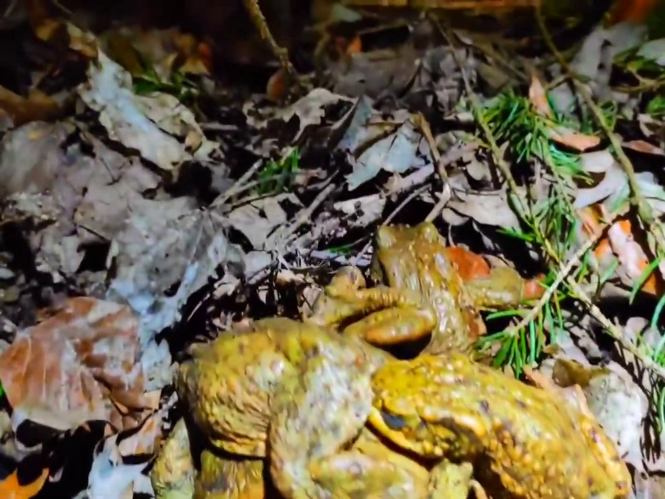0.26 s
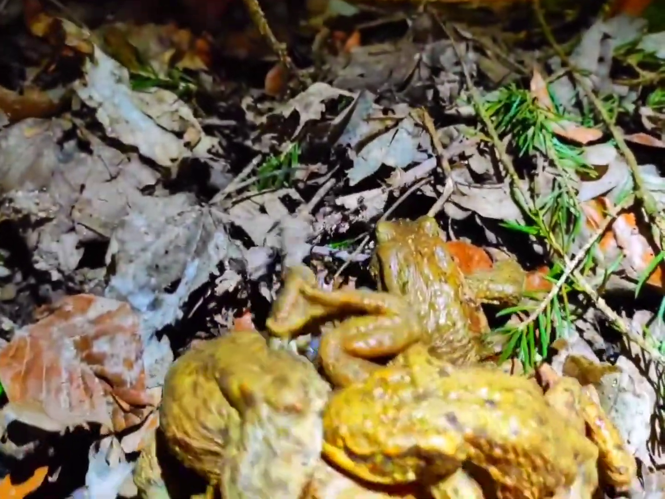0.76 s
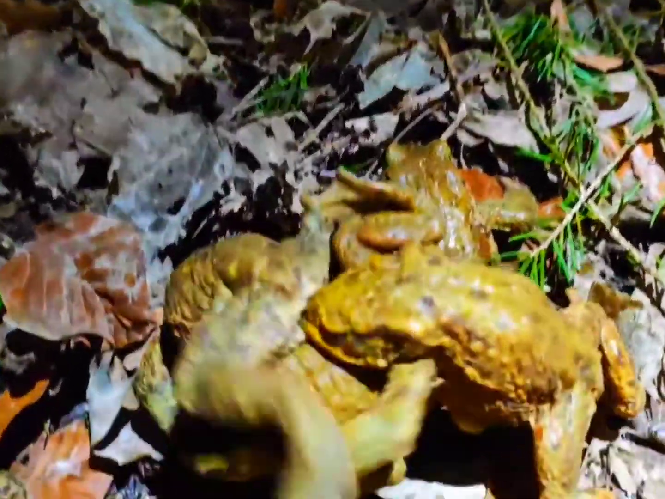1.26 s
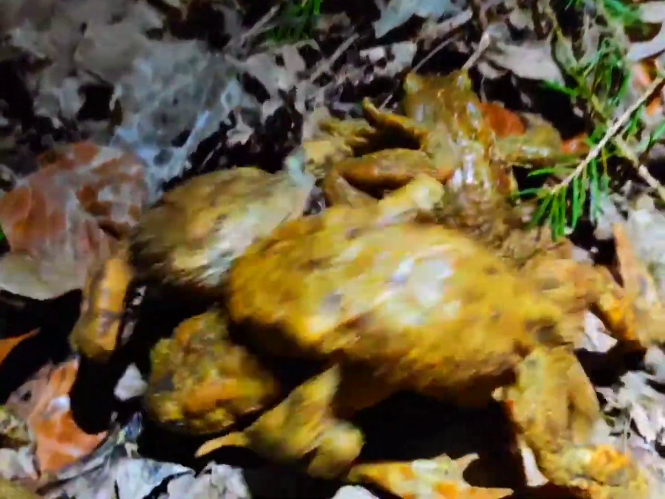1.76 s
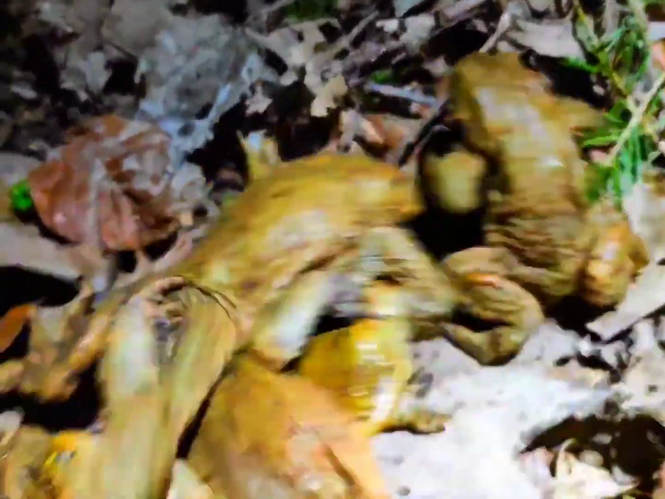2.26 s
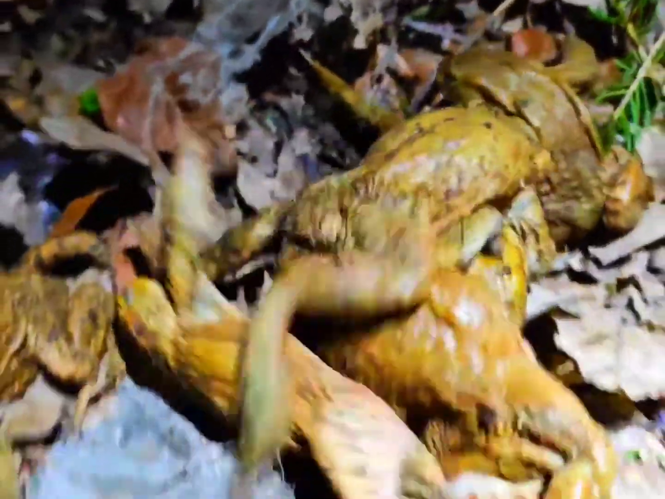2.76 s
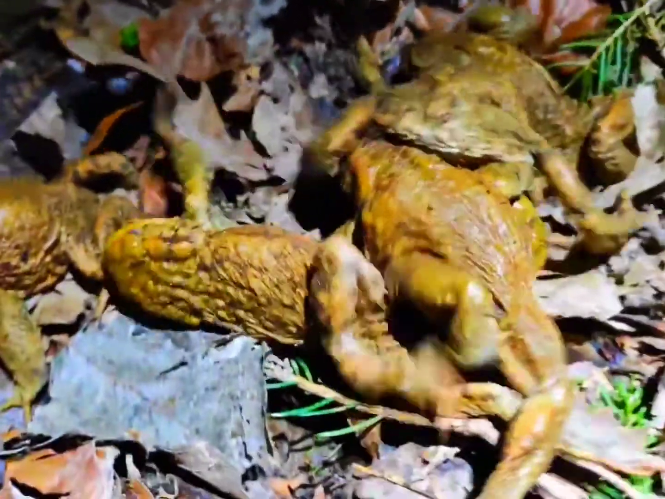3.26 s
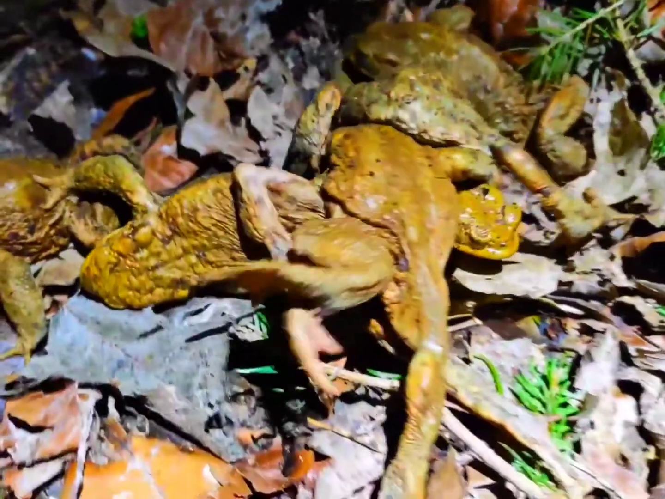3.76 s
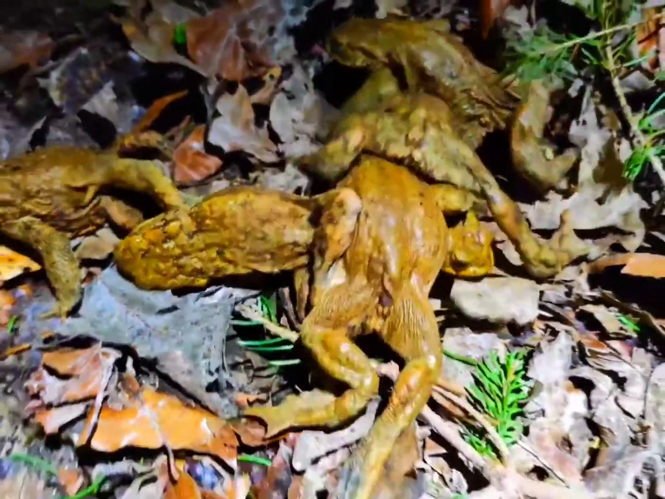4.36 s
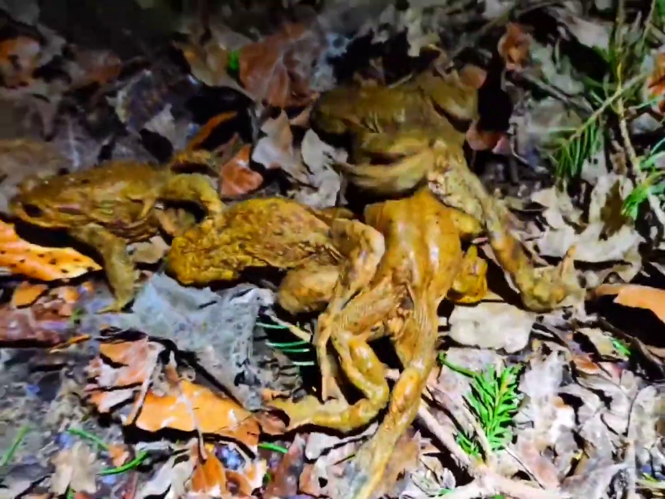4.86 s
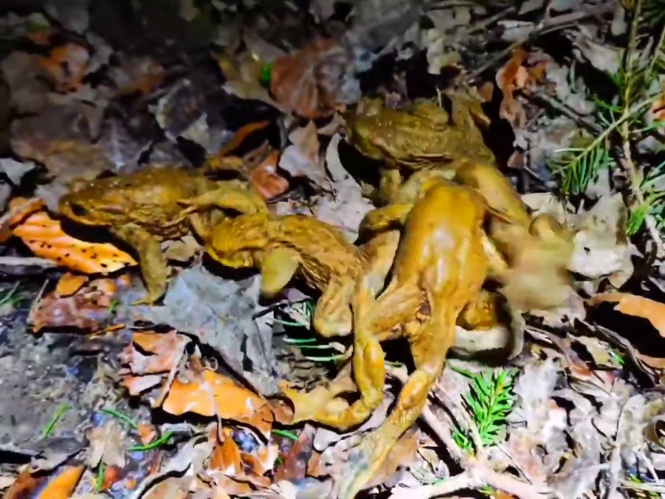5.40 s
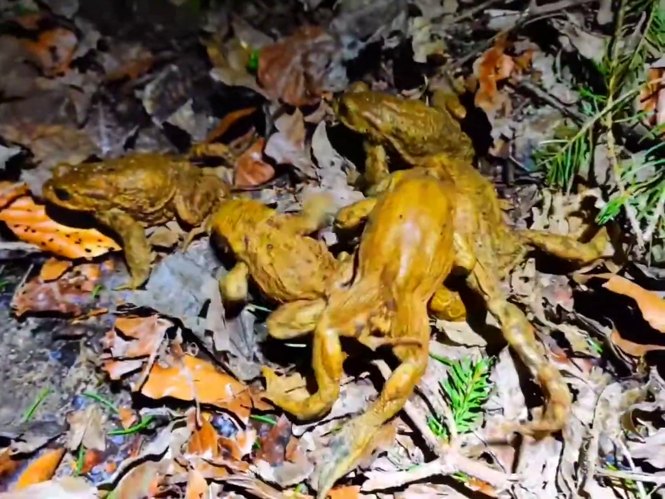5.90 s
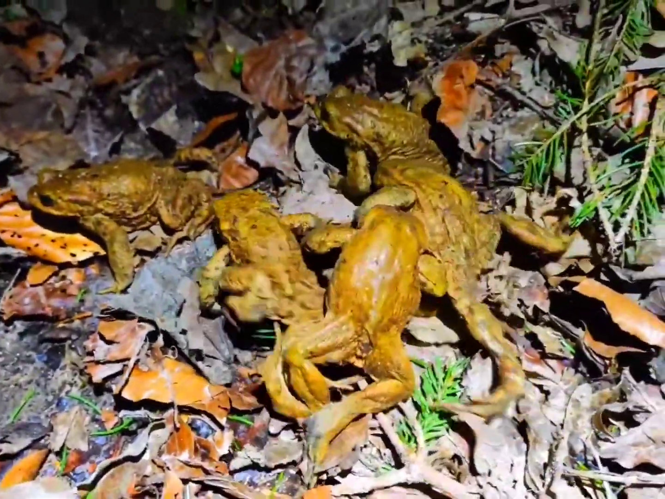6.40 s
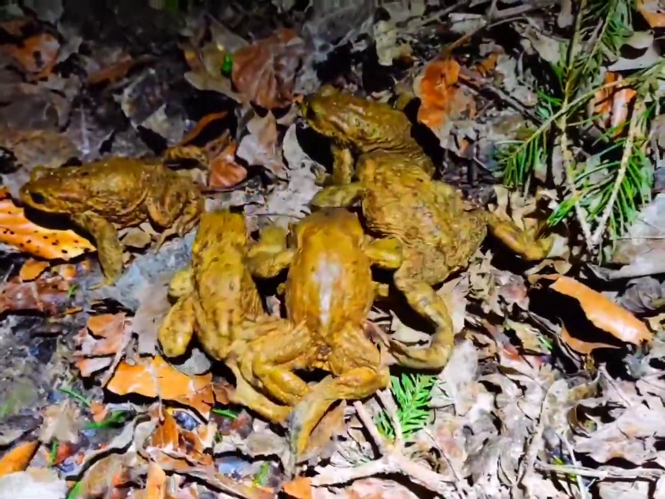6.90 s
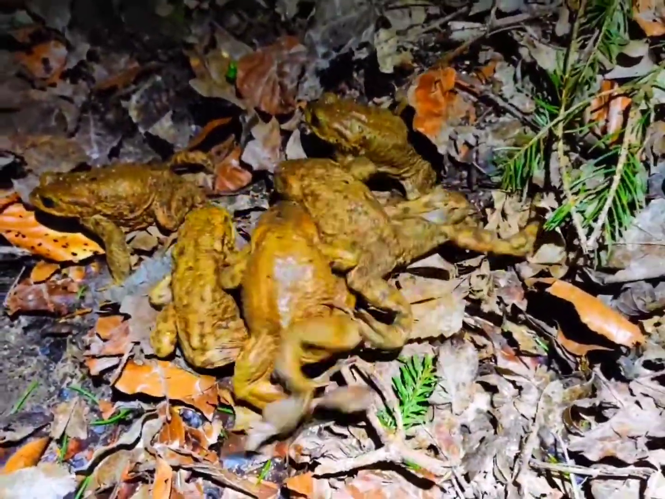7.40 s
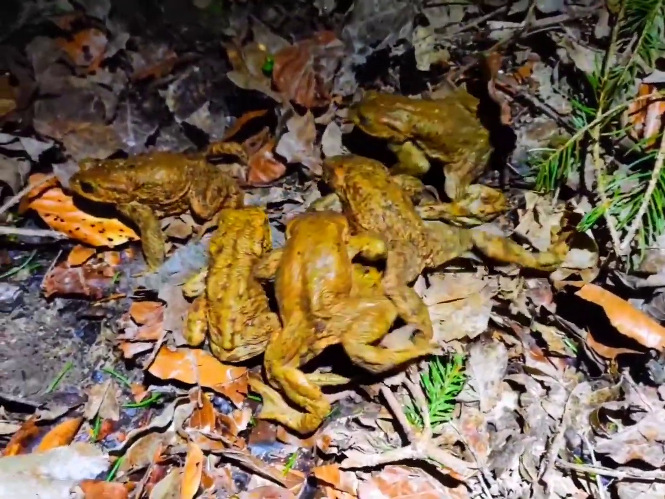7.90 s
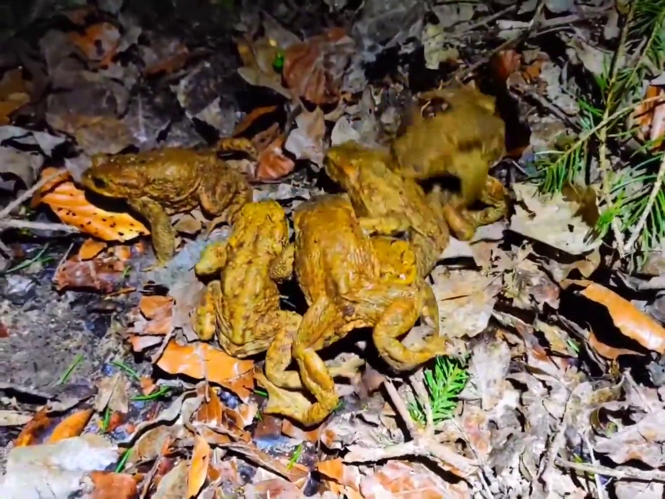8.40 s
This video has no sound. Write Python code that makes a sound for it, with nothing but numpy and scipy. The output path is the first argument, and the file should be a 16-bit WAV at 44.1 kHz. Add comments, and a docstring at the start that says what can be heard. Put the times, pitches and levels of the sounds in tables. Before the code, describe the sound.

A brief microphone rub and sharp pop, then close rustling and snapping of dry leaves as toads wrestle and occasionally chirp.

```python
"""Toads wrestle on dry leaves at night, close to a hand-held phone, and give short piping chirps.
Their vocal cords vibrate periodically: a nearly pure tone near 1 kHz with weak overtones.
The leaves hiss and scrape by friction, crackle, and ring briefly as they snap.
At first a finger covers the right microphone port, dulls it, rubs it and pops off as suction is released.
A far rumble and a faint hiss lie under all."""
import sys
import numpy as np
from scipy import signal
from scipy.fft import rfft, irfft, next_fast_len
from scipy.io import wavfile
from scipy.ndimage import uniform_filter1d, map_coordinates

SR = 44100
rng = np.random.default_rng(int(sys.argv[2]) if len(sys.argv) > 2 else 0)


def store_pcm(level_fs):
    """Save levels as 16-bit WAV."""
    pcm = np.round(np.clip(level_fs, -1, 1) * 32767).astype(np.int16)
    wavfile.write(sys.argv[1], SR, np.atleast_2d(pcm).T)


N = 381465

# Pan is the left level minus the right. Spectra give relative level per unit bandwidth.
# Contours of the three near chirps, one list each: t/s, f/Hz, level/dB, pan/dB
NEAR_CHIRPS = [
    [(1.852, 1125, -58, 0.5), (1.86, 1110, -33.5, 0.5), (1.876, 1028, -31, 0.5), (1.904, 1008, -29, 0.0),
     (1.958, 998, -30.5, -1), (1.998, 1034, -36, 3), (2.02, 1057, -42, 4.0), (2.032, 1040, -59, 4.0)],
    [(3.572, 1120, -32, -2), (3.582, 1065, -30, 3), (3.612, 1039, -38, 7), (3.626, 1026, -58, 2.5),
     (3.648, 1010, -44, -9.5), (3.672, 980, -42, -4), (3.68, 1002, -63, -5)],
    [(8.188, 985, -59, 0), (8.196, 989, -34, 2.5), (8.23, 997.4, -36, 3), (8.264, 1073, -44, 2.0),
     (8.28, 1050, -60, 2.5)],
]
# Partials of the three near callers: harmonic number, level/dB
LONG_VOICE = [(1, 1), (2, -25), (3, -30.5), (4, -24.5), (5, -46), (6, -28), (7, -38), (8, -31)]
STUTTER_VOICE = [(1, 0.5), (2, -34), (3, -20), (4, -35), (5, -26.5), (6, -40), (7, -24), (8, -34)]
LAST_VOICE = [(1, 1), (2, -19.5), (3, -20.5), (4, -27), (5, -31), (6, -23), (7, -37), (8, -39)]
LEFT_LAGS = [1.17, 0.63, 0.53]  # lag at the left port, per caller: phase/rad
OVERTONE_SLOPES = [1.2, 0.75, 1.5]  # overtone change per dB of fundamental, per caller: dB/dB
FALSE_STARTS = [(3.548, 1120, -27.5), (3.561, 1107, -26)]  # pips before the second chirp: t/s, f/Hz, level/dB
FAR_CHIRPS = [(4.2, .055, 1060, -65, 4), (4.742, .055, 1000, -66, 4), (5.969, 0.057, 1070, -62, 12),
              (6.704, 0.082, 1095, -63, 8), (7.524, 0.1, 1120, -61, 6)]  # distant toads: t/s, duration/s, f/Hz, level/dB, pan/dB

SHIFTING = [(0, -84), (.77, -63), (.96, -76), (1.15, -67), (1.56, -78), (1.76, -73), (1.79, -51),
            (2.3, -48), (2.85, -55), (3.35, -49), (3.66, -60.5), (3.71, -62), (3.85, -58), (4.6, -61),
            (4.9, -63), (5.3, -58.5), (5.7, -58.5), (6, -62), (7, -60.5), (7.45, -58), (7.85, -73),
            (8.2, -63.5), (8.65, -60)]  # hiss of leaves shifting under the toads: t/s, level/dB
SCUFFS = [(1.011, -58, 0.034, 0.018, -4), (1.102, -57, 0.028, 0.046, -1.5),
          (1.262, -50.5, 0.082, 0.029, -8), (1.389, -51, 0.042, 0.036, -6.5),
          (1.698, -56.5, 0.026, 0.037, -5), (1.774, -43, 0.003, 0.071, -7), (1.836, -37, 0.028, 0.016, -15),
          (2.094, -41, 0.21, 0.029, -8.5), (2.232, -39, 0.086, 0.048, -7.5),
          (2.474, -42, 0.036, 0.043, -13), (2.525, -43, 0.023, 0.058, -8.5), (2.69, -41, 0.024, 0.045, -8),
          (2.896, -48, 0.038, 0.035, -9), (2.944, -45, 0.028, 0.019, -12.9),
          (3.092, -48, 0.003, 0.353, -11.5), (3.443, -43, 0.015, 0.048, -35),
          (3.647, -50, 0.158, 0.014, -8), (3.938, -52.0, 0.047, 0.018, -11), (4.17, -53.5, 0.18, 0.05, -9),
          (4.35, -49, 0.028, 0.028, -8), (4.389, -51.5, 0.024, 0.017, -13.8),
          (4.447, -52, 0.046, 0.059, -9), (4.508, -53.5, 0.033, 0.039, -10), (4.605, -50, 0.039, 0.084, -9),
          (5.031, -51, 0.0034, 0.035, -4), (5.204, -47, 0.032, 0.07, -8), (5.368, -54, 0.031, 0.066, -8.9),
          (5.57, -45, 0.074, 0.15, -10), (5.798, -41, 0.003, 0.044, -11),
          (5.919, -51.5, 0.038, 0.013, -1.5), (6.111, -51.5, 0.051, 0.013, -6),
          (6.186, -51.5, 0.02, 0.025, -2.5), (6.334, -52.5, 0.053, 0.071, -11.5),
          (6.552, -62, 0.083, 0.056, -13), (6.62, -44.5, 0.0034, 0.044, -7),
          (6.742, -56.7, 0.049, 0.12, -10), (6.87, -56, 0.003, 0.047, -9),
          (7.088, -53.5, 0.108, 0.016, -13), (7.184, -52.5, 0.059, 0.03, -11.8),
          (7.257, -44.5, 0.0034, 0.13, -9), (7.458, -51, 0.021, 0.39, -7), (7.638, -54, 0.025, 0.024, -20),
          (7.758, -54, 0.025, 0.018, -3.5), (8.14, -51.5, 0.14, 0.29, -7.5), (8.336, -59, 0.023, 0.022, -7),
          (8.511, -58, 0.018, 0.025, -19)]  # leg drags: t/s, hiss level/dB, rise/s, fall/s, scrape re hiss/dB
HISS_SPECTRUM = [(1760, -32), (3000, -13.5), (3280, -15), (5560, -7), (6700, -1.5), (8130, -0.5),
                 (8420, -3.5), (10000, -18), (12400, -16.5), (15100, -15.5), (15700, -16.5)]  # fine leaf friction: f/Hz, level/dB
SCRAPE_SPECTRUM = [(300, -28), (700, -1.5), (1500, -2), (2600, -4.5), (3300, 0.5), (4500, -4),
                   (7000, -14.5)]  # coarse leaf friction: f/Hz, level/dB
LEAF_COHERENCE = [(1400, 0.16), (3100, 0.032), (6800, 0.49), (15000, 0.56)]  # leaf noise at the two ports: f/Hz, correlation
NEARNESS = [(1, 0.47), (2.4, 1.2), (3.4, 0.18), (5, -0.029), (7, -0.3), (8.65, -1.15)]  # the phone draws back from the leaves: t/s, nearness (1 close, -1 far)
NEAR_COLOUR = [(3000, -0.5), (6000, -4), (8500, 3), (11000, 3), (15000, 0)]  # what closeness adds to the hiss: f/Hz, gain/dB
SNAPS = [(0.1027, -50, 8790, -20, 10), (0.1486, -60, 5300, -28, 5), (0.3242, -53, 8640, -17, 10),
         (0.4269, -45.5, 8950, -24, 19), (0.5631, -47, 9150, -21, 18), (0.6843, -47, 8100, -10.5, 12.5),
         (0.8895, -44, 5000, -26, 9), (1.0133, -35.5, 7300, -22, 2), (1.059, -41.5, 6410, -15, -11),
         (1.2398, -35.5, 7650, -16, -13), (1.342, -40, 7900, -10, -2.5), (1.3887, -40, 5720, -25.5, -14),
         (1.6945, -34.5, 8430, -17, -0.5), (1.7731, -29, 8440, -14, -11), (1.8314, -21.5, 7990, -30, -7),
         (1.912, -30, 8020, -13, -2.0), (1.9879, -27, 8440, -24, -5.5), (2.088, -22.5, 8520, -25, 1),
         (2.2384, -25, 7790, -24, 1.5), (2.4024, -37, 7410, -18, -2.0), (2.4199, -27.5, 7900, -26, -3.5),
         (2.4581, -27.5, 8700, -25, -1.0), (2.5237, -20.5, 8240, -34, 8), (2.6218, -30, 7400, -12.5, 1),
         (2.687, -22, 7840, -23, 4), (2.7746, -30.5, 8300, -25, -5), (2.8759, -37, 8170, -18, 6),
         (2.9307, -38, 7850, -20, -0.5), (2.9437, -28.5, 8400, -24, 0.0), (3.0924, -35, 6780, -19, 0.5),
         (3.1796, -33, 7800, -23, -1.5), (3.427, -34, 6200, -25, -1), (3.567, -30, 6930, -9, -10),
         (3.676, -31, 7660, -35, -5), (3.7319, -41, 7250, -19, 4), (3.762, -34, 7190, -13, 5),
         (3.8169, -33.5, 8440, -10.5, 7), (3.8851, -38, 7960, -25, 3), (4.0202, -37, 7360, -17, 8),
         (4.0714, -33, 7850, -19, 7), (4.3485, -35, 6860, -19, 0.5), (4.3912, -31, 7900, -33, -7),
         (4.4422, -35, 7550, -12, 0.0), (4.5012, -41, 8070, -20, -2.5), (4.6034, -35.5, 8040, -12, -1),
         (4.8818, -42, 7040, -25, 5), (4.94, -31.5, 6730, -24, 5), (5.031, -36.5, 7100, -19, 3),
         (5.4286, -41, 7820, -26, -3), (5.7972, -31, 8300, -15, -8), (5.9107, -37, 7500, -11, -2.0),
         (6.0476, -38, 6300, -11, 1.0), (6.11, -36, 6640, -22, -3.0), (6.273, -32, 6430, -16, 7),
         (6.3011, -40, 6850, -16, -4.5), (6.3342, -20, 7430, -38, -7.5), (6.351, -29, 7650, -32, -9),
         (6.6225, -35, 7950, -23, 1.5), (6.869, -37, 6110, -25, 10), (6.884, -33, 7800, -27, -8),
         (7.0028, -32.5, 6270, -27, 11), (7.0567, -26, 6000, -40, 4), (7.0912, -28, 6790, -27, 2),
         (7.258, -33, 7160, -19, 1.0), (7.317, -31, 6530, -22, 12), (7.408, -37, 7700, -27, -2.5),
         (7.4844, -34, 7060, -27, -1.0), (7.5244, -33, 8140, -23, -7), (7.5428, -33, 7380, -19, 0.5),
         (7.7568, -36, 7540, -17, -3.0), (8.3654, -40, 6490, -15, 1.0), (8.3754, -42, 6500, -21, 0.0),
         (8.5038, -32, 6750, -29, 5)]  # breaking leaves: t/s, level/dB, f/Hz, thud re level/dB, pan/dB

RUBBING = [(0, -41), (.06, -37.5), (.23, -39.5), (.27, -28.5), (.38, -35.5), (.42, -45), (.49, -35.5),
           (.7, -45.5), (.83, -31), (.93, -31.5), (1.01, -41), (1.1, -37)]  # finger friction on the right port: t/s, level/dB
SLIPS = [(.263, -26.5, 0.00062), (.286, -33.5, 0.00038), (.36, -29, .0008), (.81, -34, .0008),
         (.878, -38, .0006), (0.9351, -19, 0.00063), (0.948, -25, .00016), (.961, -24, 0.000078),
         (0.9647, -18, 0.000091)]  # pressure pulses of slipping skin: t/s, level/dB, width/s
TAPS = [(.725, -45, 1040, 8), (0.772, -49, 800, 8)]  # light taps on the case: t/s, level/dB, f/Hz, pan/dB
COVERED_PORT = [(2000, -1.5), (4400, -2), (8000, -9), (10500, -10), (15000, 1)]  # response of the right port under the finger: f/Hz, gain/dB
PORT_BALANCE = [(60, -0.5), (180, 3), (550, 3), (1650, -3), (4970, 2.5), (15000, -9)]  # difference in colour between the ports: f/Hz, pan/dB

RUMBLE_SPECTRUM = [(4.7, -42), (8.0, 1.5), (47, -2.5), (64, -9), (106, -8.5), (157, -14), (228, -13),
                   (272, -16.5), (653, -26), (1080, -28.5), (1500, -39.5), (1950, -42), (3300, -120)]  # far rumble: f/Hz, level/dB
RUMBLE_COHERENCE = [(40, 0.79), (130, 0.76), (290, 0.67), (640, 0.29), (1400, 0.073)]  # rumble at the two ports: f/Hz, correlation
DRONE_LEVEL = [(1.2, -51.5), (1.66, -52.5), (2.09, -52.5), (2.51, -50.5), (7.34, -65), (7.88, -57),
               (8.65, -60.5)]  # deepest bass: t/s, level/dB
AIR_SPECTRUM = [(290, -37), (500, 5.5), (903, -34), (1040, -4.5), (1350, -10.5), (4290, -11.5), (6060, -17),
                (9080, -38), (11400, -40), (15700, -12.5)]  # night air and microphone hiss: f/Hz, level/dB

POP_S = 0.939  # the finger uncovers the right port


def toads():
    """Voiced calls: three near chirps, one with false starts, and faint far ones of falling pitch."""
    out = np.zeros((2, N))
    voices = [LONG_VOICE, STUTTER_VOICE, LAST_VOICE]
    for contour, voice, lag, slope in zip(NEAR_CHIRPS, voices, LEFT_LAGS, OVERTONE_SLOPES):
        add(out, contour[0][0], chirp(contour, voice, lag, overtone_slope=slope))
    rise_s, fall_s = 0.0039, 0.0058
    for s, hz, db in FALSE_STARTS:
        contour = [(s, hz, db - 13.5, 0), (s + rise_s, hz, db, 0), (s + rise_s + fall_s, hz, db - 27, 0)]
        add(out, s, chirp(contour, STUTTER_VOICE, LEFT_LAGS[1]))
    sag_hz_per_s = 720
    for s, length, hz, db, pan_db in FAR_CHIRPS:
        contour = [(s, hz, db, pan_db), (s + length, hz - sag_hz_per_s * length, db, pan_db)]
        add(out, s, chirp(contour, LAST_VOICE[:2], lag_rad=1.74, edge_s=0.025))
    return out


def chirp(contour, voice, lag_rad, edge_s=0.0016, overtone_slope=1):
    """Periodic vibration of the vocal cords gives a harmonic series with weak, unsteady overtones."""
    t = np.arange(contour[0][0], contour[-1][0], 1 / SR)
    hz, db, pan_db = curves(contour, t)
    phase = 2 * np.pi * np.cumsum(hz) / SR
    port_lag = np.array([[lag_rad], [0]])
    drifts_db = 10 * uniform_filter1d(rng.standard_normal((len(voice), len(t))), size=400, axis=1)
    tilt_db = (1 - overtone_slope) * (db.max() - db)
    tone = 0
    for (k, partial_db), drift_db in zip(voice, drifts_db):
        gain = amp(partial_db + (drift_db + tilt_db) * (k > 1))
        tone += gain * np.sin(k * phase + k * k - port_lag)
    fade = np.clip(np.minimum(t - t[0], t[-1] - t) / edge_s, 0, 1)
    return np.sqrt(2) * amp(db) * fade * tone * sides(pan_db)


def leaves():
    """Friction makes a fine hiss and a coarse scrape; shifting and scuffs, being incoherent, add in power."""
    t = np.arange(N) / SR
    hiss_power = amp(curves(SHIFTING)[0]) ** 2
    scrape_power = hiss_power * amp(-8) ** 2
    for s, db, rise, fall, scrape_db in SCUFFS:
        scuff_power = (amp(db) * hump(t, s, rise, fall)) ** 2
        hiss_power += scuff_power
        scrape_power += scuff_power * amp(scrape_db) ** 2
    # Clumps of leaves give way at once and settle.
    collapses_per_s, collapse_share = 70, 0.26
    collapses = (rng.random(N) < collapses_per_s / SR) * np.minimum(rng.exponential(size=N), 2.5)
    surge = unit(1 - collapse_share + collapse_share * settle(collapses, fall_s=0.014))
    clump_gain = amp(1.9 * wobble(per_second=40))
    fine = patchy(crackle(per_second=250, spread_db=4.5, share=0.33), depth_db=2)
    hiss = draw_back(stereo_noise(fine, HISS_SPECTRUM, LEAF_COHERENCE) * clump_gain)
    coarse = patchy(crackle(per_second=120, spread_db=3, share=0.13), depth_db=2.5)
    scrape = stereo_noise(coarse, SCRAPE_SPECTRUM, LEAF_COHERENCE) * clump_gain
    return surge * (np.sqrt(hiss_power) * hiss + np.sqrt(scrape_power) * scrape)


def crackle(per_second, spread_db, share):
    """A Poisson process of tiny cracks modulates the amplitude of two independent noises."""
    onsets = rng.random(N) < per_second / SR
    strengths = amp(spread_db * np.minimum(rng.exponential(size=N), 3))
    cracks = settle(onsets * strengths, fall_s=0.00097)
    return rng.standard_normal((2, N)) * (np.sqrt(1 - share) + np.sqrt(share) * cracks)


def patchy(pair, depth_db):
    """Each clump of leaves has its own spectrum: gain varies at random over time and frequency."""
    spectra = signal.stft(pair, nperseg=256)[2]
    field = uniform_filter1d(rng.standard_normal(spectra.shape[1:]), size=8, axis=0)
    field = uniform_filter1d(field, size=6, axis=1)
    return signal.istft(spectra * amp(depth_db * unit(field)), nperseg=256)[1][:, :N]


def draw_back(hiss):
    """Timbre depends on distance: the hiss passes from a crisp spectrum to a duller one."""
    close = unit(coloured(hiss, NEAR_COLOUR))
    far = unit(filtered(hiss, lambda hz: amp(-along(NEAR_COLOUR, hz))))
    share = np.clip((1 + curves(NEARNESS)[0]) / 2, 0, 1)
    return share * close + (1 - share) * far


def snaps():
    """Fracture excites a leaf impulsively: one damped mode, a broadband crack and a duller thud."""
    out, t = np.zeros((2, N)), np.arange(600) / SR
    attack = 1 - np.exp(-t / 0.00014)
    for s, db, hz, thud_db, pan_db in SNAPS:
        noise = rng.standard_normal(len(t))
        ring = np.sin(2 * np.pi * hz * t) * decay(t, t60_s=0.0059)
        crack = 0.2 * noise * decay(t, t60_s=0.0051)
        thud_noise = unit(np.diff(uniform_filter1d(noise, size=6), prepend=0))
        thud = 2.5 * amp(thud_db) * thud_noise * decay(t, t60_s=0.0044)
        add(out, s, amp(db) * attack * (ring + crack + thud) * sides(pan_db)[:, None])
    return out


def finger_rub():
    """Stick-slip friction of skin on the port gives a low rumble, grit and brief pressure dips."""
    t = np.arange(N) / SR
    lift_s, fade_s = 1.07, 0.086
    contact = np.clip((lift_s - t) / fade_s, 0, 1)
    rub_db, = curves(RUBBING)
    grit_db = -59 + 1.74 * (rub_db - np.mean(RUBBING, axis=0)[1])  # the grit swings wider than the rub
    rub = unit(coloured(rng.standard_normal(N), [(8, -11), (25, 13.5), (70, 2.5), (150, -12), (300, -80)]))
    grains = crackle(per_second=60, spread_db=6.5, share=1)[0]
    grit = unit(coloured(grains, [(90, -40), (200, 14), (600, -14), (1500, -60)]))
    slips = sum(amp(db) * np.exp(-((t - s) / width) ** 2) for s, db, width in SLIPS)
    return contact * (amp(rub_db) * rub + amp(grit_db) * grit) - slips


def finger_pop():
    """Suction rarefies the trapped air; the seal breaks, the pressure rebounds and air hisses in."""
    t = np.arange(N) / SR
    suction = amp(-13.5) * hump(t, POP_S - 0.008, rise_s=0.0057, fall_s=0.0026)
    pop = amp(2) * hump(t, POP_S, rise_s=0.00019, fall_s=0.00019)
    rebound = amp(-11) * hump(t, POP_S + 0.0014, rise_s=0.001, fall_s=0.008)
    air = unit(coloured(rng.standard_normal(N), [(300, -20), (1500, 0), (6500, -7), (9000, -40)]))
    inrush = amp(-44) * hump(t, POP_S, rise_s=0.0037, fall_s=0.022) * air
    return rebound + inrush - suction - pop


def case_taps():
    """Each light impact excites one heavily damped mode of the case."""
    out, t = np.zeros((2, N)), np.arange(600) / SR
    for s, db, hz, pan_db in TAPS:
        ring = np.sin(2 * np.pi * hz * t) * decay(t, t60_s=0.012)
        add(out, s, amp(db) * ring * sides(pan_db)[:, None])
    return out


def night():
    """Ambient noise: a far rumble, most coherent at long wavelengths, a deep drone and a faint hiss."""
    rumble = stereo_noise(rng.standard_normal((2, N)), RUMBLE_SPECTRUM, RUMBLE_COHERENCE)
    rumble *= amp(-52.5 + 1.06 * wobble(per_second=5))
    drone_spectrum = [(22, -19), (38, 7), (46, 2.5), (70, -43.5)]
    drone = stereo_noise(rng.standard_normal((2, N)), drone_spectrum, coherence=[(40, 0.39)])
    air = stereo_noise(rng.standard_normal((2, N)), AIR_SPECTRUM, coherence=[(1000, 0.07)])
    return rumble + amp(curves(DRONE_LEVEL)[0]) * drone + amp(-67) * air


def stereo_noise(pair, spectrum, coherence):
    """The ratio of sum to difference signal sets the correlation of a coloured pair of rms 1."""
    def response(hz):
        angle = np.arccos(np.clip(along(coherence, hz), -1, 1)) / 2
        return amp(along(spectrum, hz)) * [np.cos(angle), np.sin(angle)]
    mid, side = filtered(pair, response)
    return unit(np.array([mid + side, mid - side]))


def filtered(x, response):
    """Linear filtering multiplies the spectrum by a frequency response."""
    size = next_fast_len(N + 8192)
    return irfft(rfft(x, size) * response(np.fft.rfftfreq(size, 1 / SR)), size)[..., :N]


def coloured(x, spectrum):
    """Spectral shaping by points of f/Hz, gain/dB."""
    return filtered(x, lambda hz: amp(along(spectrum, hz)))


def along(points, hz):
    """Interpolation on a logarithmic frequency axis."""
    f, values = np.transpose(points)
    return np.interp(np.log(hz + 1), np.log(f + 1), values)


def curves(rows, t=None):
    """Linear interpolation in time of each column after the first."""
    times, *columns = np.transpose(rows)
    return [np.interp(np.arange(N) / SR if t is None else t, times, column) for column in columns]


def wobble(per_second):
    """Slow fluctuation: a spline through evenly spaced random values."""
    knots = rng.standard_normal(int(N * per_second / SR) + 4)
    return map_coordinates(knots, [np.arange(N) * per_second / SR])


def settle(impulses, fall_s):
    """Exponential relaxation after each impulse, at rms 1."""
    return unit(signal.lfilter([1], [1, -np.exp(-1 / (SR * fall_s))], impulses))


def hump(t, peak_s, rise_s, fall_s):
    """Exponential growth to 1, then exponential decay."""
    return np.exp(np.where(t < peak_s, (t - peak_s) / rise_s, (peak_s - t) / fall_s))


def decay(t, t60_s):
    """Damping by 60 dB in t60_s."""
    return amp(-60 * t / t60_s)


def amp(db):
    """Amplitude ratio of a level."""
    return 10 ** (np.asarray(db) / 20)


def unit(x):
    """Normalisation to rms 1."""
    return x / np.sqrt(np.mean(x ** 2) + 1e-20)


def sides(pan_db):
    """Left and right gains for a level difference."""
    return amp(np.array([pan_db / 2, -pan_db / 2]))


def add(out, s, sound):
    """Superposition of a stereo sound from time s."""
    part = out[:, round(s * SR):][:, :sound.shape[1]]
    part += sound[:, :part.shape[1]]


def scene():
    """Pressures superpose at two ports; the finger shades the right one from treble until the pop."""
    litter = filtered(leaves() + snaps(), lambda hz: sides(along(PORT_BALANCE, hz)))
    left, right = litter + toads() + night()
    right = np.where(np.arange(N) / SR < POP_S, coloured(right, COVERED_PORT), right)
    finger = finger_rub() + finger_pop()
    return np.array([left + 0.015 * finger, right + finger]) + case_taps()


def record(dry):
    """Band limiting: the phone attenuates the highest treble and passes nothing above its cutoff."""
    shelf_hz, cutoff_hz = 15700, 16780
    return filtered(dry, lambda hz: (hz < cutoff_hz) * np.where(hz < shelf_hz, 1, amp(-33)))


dry = scene()
out = record(dry)
store_pcm(out)
```